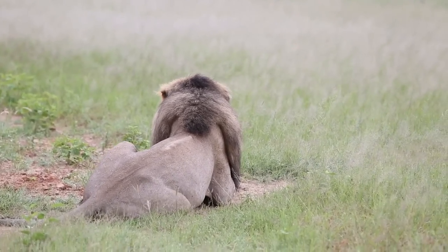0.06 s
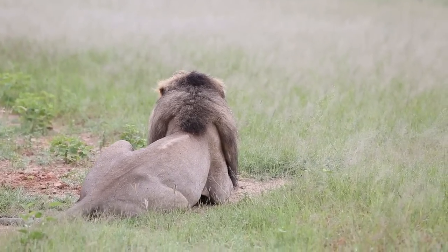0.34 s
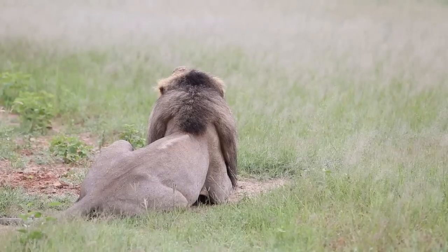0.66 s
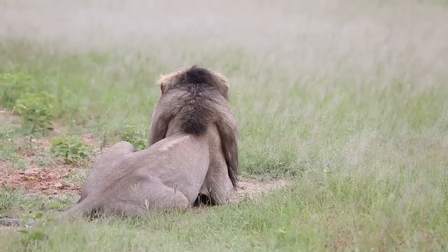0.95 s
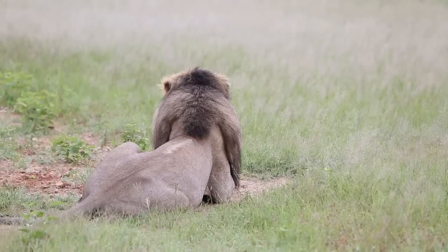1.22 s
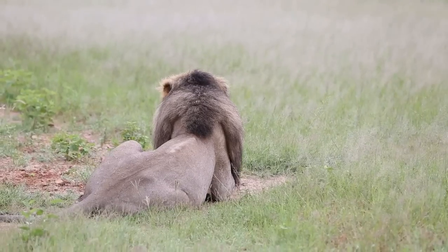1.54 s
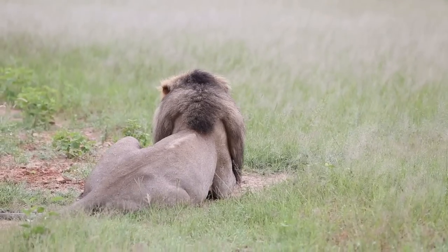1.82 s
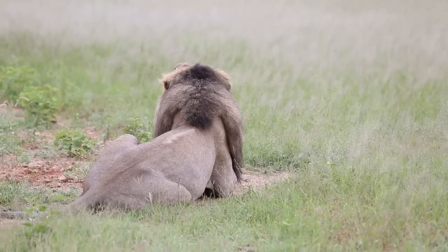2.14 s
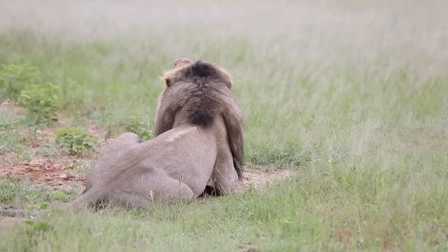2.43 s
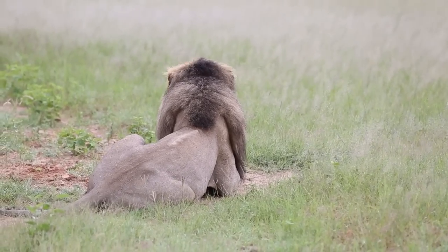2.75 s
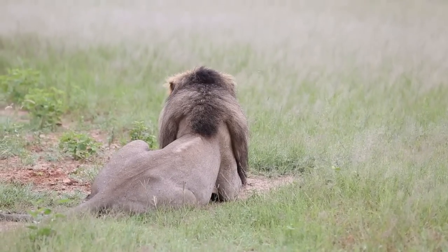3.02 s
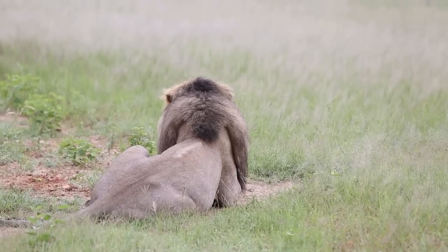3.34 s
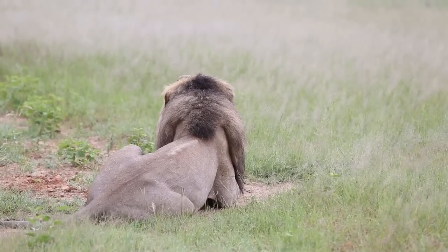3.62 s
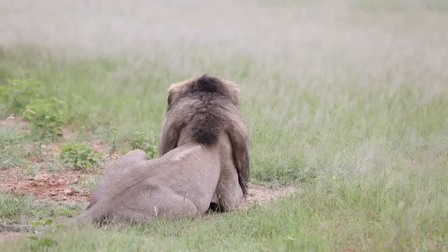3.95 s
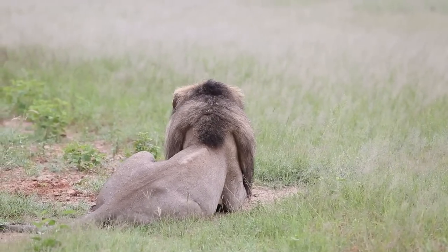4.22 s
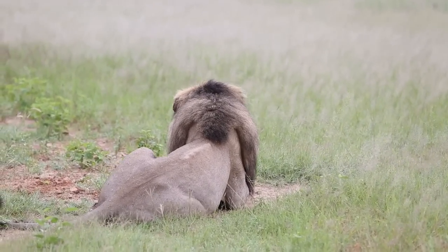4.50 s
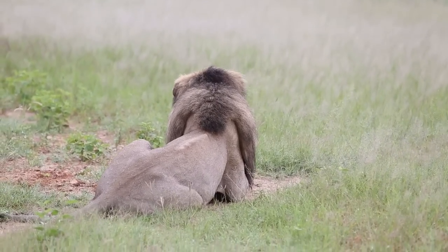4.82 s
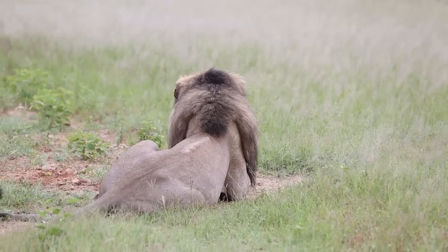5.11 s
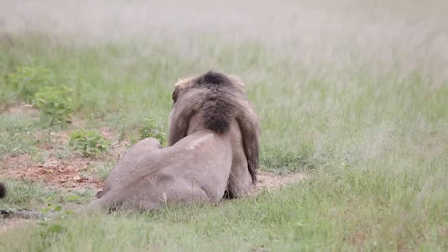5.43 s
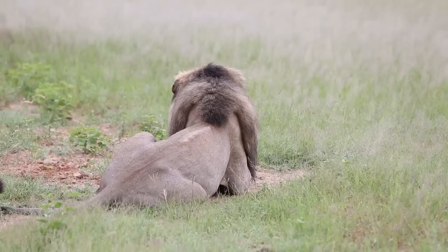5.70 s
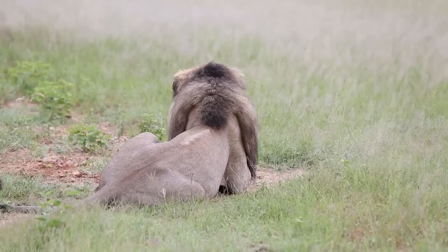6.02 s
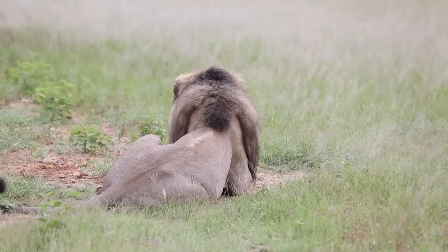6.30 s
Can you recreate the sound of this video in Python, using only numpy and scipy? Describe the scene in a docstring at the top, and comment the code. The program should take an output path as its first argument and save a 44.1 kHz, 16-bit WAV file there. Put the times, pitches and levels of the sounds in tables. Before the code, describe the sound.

In open grassland a lion moans twice, low and throaty, each call swelling and then falling away. A couple of soft body thuds and a quiet breath lead into three short, rough grunts at an even pace. The voice is loud and nearly dry at the microphone. Underneath, a light wind murmurs and hisses in the grass, and birds squawk faintly far off.

```python
"""In open grassland a lying lion gives two long moans and three shorter grunts.
The voice is a source and a filter: heavy vocal folds swing cleanly or break into a rasp,
and their closures excite the resonances of a long throat and a half-open mouth.
Between calls the lion draws air and shifts its weight with soft thuds.
Birds squawk and whistle far off, over the murmur, hiss and rumble of a light breeze."""
import sys
import numpy as np
from scipy import signal
from scipy.fft import rfft, irfft
from scipy.io import wavfile

SR = 44100
rng = np.random.default_rng(int(sys.argv[2]) if len(sys.argv) > 2 else 0)


def inscribe(sig):
    """Save sig as 16-bit PCM at rate SR to the path in sys.argv[1].

    A 1-D sig is mono; a 2-D sig holds one channel per row.
    Samples are clipped to [-1, 1] before scaling.
    """
    pcm = np.round(np.clip(np.atleast_2d(sig).T, -1, 1) * 32767)
    wavfile.write(sys.argv[1], SR, pcm.astype(np.int16))


N = 289296
TIME = np.arange(N) / SR
HELD_HZ = 134.4  # pitch at the end of a grunt's hold

# Gain laws of the voice's layers. Each gives: level in dB at full effort, dB per dB of effort,
# then dB added per unit of mouth opening (squared for the swing), of roughness and of throb depth.
SWING_GAIN = (-9.5, 1, -5.5, -2, -0.5)
THROAT_GAIN = (-27.5, 1.04, 0, 6.5, 5.5)
MOUTH_GAIN = (-37.5, 1, 15.5, 2.5, 0.5)
RASP_GAIN = (-59.5, 0.54, 10, 9.5, 0)
HISS_GAIN = (-62.5, 0.4, 4, 4.5, 2)
def lion():
    """Source and filter: the folds' swing is the fundamental; closures and air excite the tract."""
    (hz, effort_db, opening, rough, depth, cycles_per_throb), gate, spent = bout()

    def gain(law, openness=opening, full_effort_db=-10):
        full_db, slope, open_db, rough_db, throb_db = law
        driven_db = full_db + slope * (effort_db - full_effort_db)
        return undb(driven_db + open_db * openness + rough_db * rough + throb_db * depth)

    # slack, slow folds leak more air, and more escapes as a call runs out
    leak = undb(5.5 * np.log2(HELD_HZ / hz) + 4 * spent)
    hz = hz * (1 + (.009 + .07 * rough ** 2) * walk(45))  # pitch jitter
    cycles = np.cumsum(hz) / SR
    throb_phase = 2 * np.pi * np.cumsum(hz / cycles_per_throb) / SR
    swing = fold_swing(2 * np.pi * cycles, throb_phase, depth, rough)
    # even closures give clean overtones; ragged ones, each with a puff of air, give the rasp
    even = closures(cycles, scatter_db=1, slip_s=.00005)
    even = steady(even * (1 + .45 * depth * np.cos(throb_phase)), .06)
    puff = unit(np.exp(-(cycles % 1) / .3))
    ragged = steady(closures(cycles, scatter_db=6.5, slip_s=.0005) + puff * noise(), .013)
    voice = gain(SWING_GAIN, opening ** 2) * swing  # gives way when the mouth is wide open
    voice += gain(RASP_GAIN) * leak * rasp(even, ragged, puff, rough)
    voice += gain(HISS_GAIN) * leak * muzzle_hiss(puff)
    voice += gain(THROAT_GAIN) * throat(even, ragged, rough)
    voice += gain(MOUTH_GAIN) * mouth(even, ragged, rough, opening)
    return voice * gate


def fold_swing(phase, throb_phase, depth, rough):
    """Modulation: the throb adds a sideband on each side of the fundamental, the upper one stronger."""
    swing = np.sin(phase) * (1 + 3.38 * rough ** 2 * walk(51)) + .2 * np.sin(2 * phase)
    sidebands = .72 * np.sin(phase + throb_phase) + .45 * np.sin(phase - throb_phase)
    return steady(band(swing + depth * sidebands, 113.9, 281.4, order=5), .026)


def closures(cycles, scatter_db, slip_s):
    """Shimmer and jitter: one pulse a cycle, each with its own size and a little early or late."""
    crossings = np.flatnonzero(np.diff(np.floor(cycles)) > 0)
    chance = rng.standard_normal((len(crossings), 2))
    size = undb(scatter_db * chance[:, 0])
    on_time = np.interp(np.floor(cycles[crossings + 1]), cycles, np.arange(N))
    place = on_time + slip_s * SR * chance[:, 1]
    sample, part = np.clip(place.astype(int), 0, N - 2), place % 1
    return unit(np.bincount(sample, size * (1 - part), N) + np.bincount(sample + 1, size * part, N))


# Throat resonances. Each row: frequency in Hz, bandwidth in Hz, relative gain in dB.
THROAT_MODES = [(262, 38, -23), (314, 27, 26), (378, 9.4, 4), (448, 19, -0.5), (454, 140, -18.5)]
def throat(even, ragged, rough, flutter_db=3):
    """Resonance: the long throat rings at low formants, wavering in level."""
    source = np.sqrt(1 - rough ** 2) * even + 1.2 * rough * ragged
    formants = band(ring(source, THROAT_MODES), 287.8, 498, order=5)
    return steady(formants, .022) * undb(flutter_db * walk(20))


# Mouth resonances. Each row: frequency in Hz, bandwidth in Hz, relative gain in dB.
MOUTH_MODES = [(550, 27, -21.5), (700.3, 23.3, 5.5), (770, 53, -4), (865, 61, -1), (980, 46, 3),
               (1038.3, 67, 10), (1217, 35, 5.5), (1281, 40, 3.5), (1367, 68, -2)]
def mouth(even, ragged, rough, opening):
    """Formant filtering: an open jaw favours the upper resonances of the mouth."""
    # high overtones break up sooner than low ones
    hoarse = np.sqrt(1 - rough) * even + 1.8 * rough ** .75 * ragged
    jaw_db = -5 + 7 * opening
    formants = ring(hoarse, MOUTH_MODES[:4]) + undb(jaw_db) * ring(hoarse, MOUTH_MODES[4:])
    return steady(band(formants, 589, 1320, order=6), .16)


# High resonances of the voice. Each row: frequency in Hz, bandwidth in Hz, relative gain in dB.
RASP_MODES = [(1690, 94, 1), (1887, 150, -2), (2200, 190, -6), (2640, 200, -9), (2930, 96, -9.5),
              (3160, 110, -5)]
def rasp(even, ragged, puff, rough):
    """Aperiodic excitation: as roughness grows, ragged closures and breath drive the high formants."""
    breath = (1 + .35 * puff) * noise()
    source = (1 - rough) * even + 1.5 * rough * ragged + rough * breath
    return steady(band(ring(source, RASP_MODES), 1300, 3100, order=4), .45)


# Muzzle resonances. Each row: frequency in Hz, bandwidth in Hz, relative gain in dB.
MUZZLE_MODES = [(3940, 180, 8.5), (4360, 780, 1.5), (5260, 3800, -8), (6000, 1900, -9), (8300, 2000, -23.5)]
def muzzle_hiss(puff, flicker_db=2.3):
    """Turbulence: pulsing air excites muzzle resonances, each of which comes and goes by itself."""
    air = noise() * (1 + .5 * puff)
    hiss = sum(ring(air, [mode]) * undb(3 * walk(4)) for mode in MUZZLE_MODES)
    return unit(band(hiss, 3700, 11000, order=3)) * undb(flicker_db * walk(16))


# Fold vibration in the moans. Each row: time in seconds, pitch in Hz.
MOAN_PITCH = [(.08, 137.1), (.18, 190), (.3, 220), (.4, 234.2), (.52, 243.9), (.64, 220.5), (.735, 234),
              (.765, 174.5), (.9, 123.3), (.97, 140.9), (1.05, 101.7), (1.99, 120.7), (2.05, 158.2),
              (2.12, 185.1), (2.2, 192.1), (2.29, 193.5), (2.34, 176.6), (2.45, 176.8), (2.5, 155.3),
              (2.67, 113), (2.81, 100.2)]
# Effort and jaw, one list a moan. Each row: time in seconds, effort in dB, mouth opening from 0 to 1.
MOAN_EFFORT = [
    [(.025, -24.5, 0), (.1, -10, 0.05), (.21, -9, 0.2), (.27, -11.5, 0), (.35, -11, .25), (.42, -13, 0.36),
     (.48, -9.5, 0.34), (.62, -10, 0.28), (.68, -15.5, 0.69), (.75, -11.5, 0.95), (.78, -8.5, .15),
     (.84, -11.5, 0), (.92, -20.5, 0.27), (.98, -10.5, 0.24), (1.09, -49, 1)],
    [(1.94, -29.5, 0.12), (2.045, -7.5, 0.29), (2.2, -13.5, .62), (2.26, -12, 0.86), (2.39, -11.5, 0.83),
     (2.49, -11, 0.57), (2.54, -9, 0), (2.65, -17.5, 0.33), (2.74, -27, 0.34), (2.81, -48, 0.16)],
]
# The folds start ragged, clear and break again. Each row: time in seconds, roughness from 0 to 1.
MOAN_ROUGHNESS = [(.03, .6), (.19, .45), (.25, .16), (.42, .17), (.5, .25), (.63, .17), (.73, .65),
                  (.78, .12), (.84, .12), (.89, .7), (.97, .35), (2.04, .48), (2.15, .25), (2.35, .27),
                  (2.47, .48), (2.51, .1), (2.6, .12), (2.66, .55)]
# Throbs in the second moan. Each row: start in seconds, length in seconds, modulation depth,
# fold cycles per throb.
MOAN_THROBS = [(2.07, .26, 1.8, 5), (2.32, .18, 1, 3)]
def moans():
    """Subharmonic locking: the moans' controls glide, and a slower throb briefly locks to the folds."""
    depth, cycles_per_throb = np.zeros(N), np.ones(N)
    for start, length, peak_depth, count in MOAN_THROBS:
        depth = np.maximum(depth, peak_depth * np.abs(swell(start, length)) ** .5)
        cycles_per_throb[TIME > start] = count
    glides = curves(MOAN_PITCH) + curves(np.vstack(MOAN_EFFORT)) + curves(MOAN_ROUGHNESS)
    return np.array(glides + [depth, cycles_per_throb])


def grunt(start, rise_s, hold_s, fade_s, peak_db, peak_hz, peak_opening):
    """Period doubling follows the peak of a push whose controls rise, hold and slacken."""
    sag_s, slack_hz = .11, 98.7
    peak = start + rise_s
    slack = peak + hold_s
    stages = [start, peak, slack, slack + sag_s]
    hz = np.interp(TIME, stages, [.85 * peak_hz, peak_hz, HELD_HZ, slack_hz])
    rise_left = np.clip((peak - TIME) / rise_s, 0, 1)
    faded = np.clip((TIME - slack) / fade_s, 0, 1)
    effort_db = peak_db - 29 * (rise_left ** 2.15 + faded ** 1.54)
    opening = np.interp(TIME, stages, [0, peak_opening, .28, .39])
    # the folds are ragged at both ends and clearest late in the hold
    rough = np.interp(TIME, [start, peak, slack, slack + fade_s], [.55, .52, .27, .85])
    depth = 1.4 * np.exp(-((TIME - peak - .03) / .041) ** 2)
    cycles_per_throb = np.full(N, 2)
    return np.array([hz, effort_db, opening, rough, depth, cycles_per_throb])


# The grunts. Each row: start, rise, hold and fade in seconds, then at the peak the effort in dB,
# pitch in Hz and mouth opening from 0 to 1.
GRUNTS = [(3.488, 0.12, .15, .255, -10, 150.3, 0.46), (4.588, 0.11, .075, .245, -9.5, 136, 0.58),
          (5.6, .1, .075, 0.23, -10.5, 126.8, 0.21)]
def bout():
    """Phonation in five breaths: the controls, a gate open in each call, and its progress (0 to 1)."""
    controls = moans()
    spans = [(moan[0][0], moan[-1][0]) for moan in MOAN_EFFORT]
    for start, rise_s, hold_s, fade_s, *at_peak in GRUNTS:
        mid_pause = (spans[-1][1] + start) / 2
        controls = np.where(TIME > mid_pause, grunt(start, rise_s, hold_s, fade_s, *at_peak), controls)
        spans.append((start, start + rise_s + hold_s + fade_s))
    spent = np.interp(TIME, np.ravel(spans), [0, 1] * len(spans))
    return controls, sounding(spans, fade_s=.017), spent


# The folds catch and slap shut. Each row: time in seconds, peak level in dB.
FOLD_CATCHES = [(.116, -17.5), (.192, -19), (2.044, -13), (2.645, -21), (3.562, -24), (3.609, -15),
                (4.683, -16), (4.707, -14), (5.674, -23)]
def catches():
    """Impulse response: a single hard closure makes the mouth crack."""
    slaps = np.zeros(N)
    for start, db in FOLD_CATCHES:
        slaps[int(start * SR)] += undb(db)
    crack = band(ring(signal.unit_impulse(SR // 10), MOUTH_MODES), 600, 1400, order=5)
    return signal.fftconvolve(slaps, crack / np.abs(crack).max())[:N]


# Hollow vowels as the calls die. Each row: start in seconds, peak level of the lower tone in dB.
THROAT_RELEASES = [(0.864, -24), (0.979, -23), (2.628, -16.5), (2.709, -29), (3.868, -21.5), (4.846, -22.5),
                   (5.84, -16.5), (5.965, -29.5)]
def releases(length_s=.0579, from_hz=268, to_hz=321):
    """Formant glide: as the throat relaxes, its lowest resonance and a weak, breathy upper one rise."""
    out = np.zeros(N)
    for start, db in THROAT_RELEASES:
        out += glide(start, length_s, from_hz, to_hz, db, waver=.0414)
        out += glide(start, length_s, 2.5 * from_hz, 2.8 * to_hz, db - 16, waver=.1)
    return out


# Breaths drawn before a call. Each row: start and length in seconds, chest and muzzle levels in dB.
INHALATIONS = [(1.646, 0.28, -35.5, -53.5), (3.173, 0.24, -56, -61), (3.382, 0.073, -40, -55)]
def inhalations():
    """Turbulent inflow: air flutters low in the chest and rushes through the muzzle's resonances."""
    chest_spectrum = [(25, -13), (70, .5), (140, 7), (300, -3), (500, -10.5), (1000, -59)]
    chest = steady(colour(noise(), chest_spectrum), .45)
    rush = ring(noise(), [(825, 96, 31), (1250, 230, 27.5), (1900, 500, -8)])
    muzzle = unit(band(rush, 500, 2100)) * undb(2 * walk(30))
    out = np.zeros(N)
    for start, length, chest_db, muzzle_db in INHALATIONS:
        gate = sounding([(start, start + length)], fade_s=.01)
        out += (undb(chest_db) * chest + undb(muzzle_db) * muzzle) * gate
    return out


# The lion shifts its weight. Each row: centre in seconds, envelope peak in dB, frequency in Hz.
BODY_THUDS = [(3.102, -18, 123), (3.122, -28, 70), (3.306, -25.5, 114)]
def thuds():
    """Pressure transients: each soft thud is about one cycle of a low tone."""
    return sum(undb(db) * np.exp(-((TIME - at) * hz / .3) ** 2) * np.sin(2 * np.pi * hz * (TIME - at))
               for at, db, hz in BODY_THUDS)


# Distant squawks. Each row: start in seconds, then the third harmonic's peak level in dB
# and centre frequency in Hz.
BIRD_SQUAWKS = [(1.557, -55, 2020), (2.915, -57.5, 1865), (3.226, -59, 2200), (4.19, -47, 1806),
                (4.567, -43.5, 1878), (6.11, -42.5, 1876), (6.228, -48.5, 1765)]
# A falling whistle: start and length in seconds, first and last frequency in Hz.
BIRD_WHISTLE = (1.815, .145, 6500, 1950)
def birds(squawk_s=.07):
    """Frequency modulation: harsh squawks on harmonics three to five, a whistle and a short close pip."""
    out = np.zeros(N)
    for start, db, third_hz in BIRD_SQUAWKS:
        for harmonic, tilt_db in ((3, 0), (4, -1), (5, -6)):
            hz = third_hz * harmonic / 3
            out += glide(start, squawk_s, .96 * hz, 1.04 * hz, db + tilt_db, waver=.05)
    whistle = glide(*BIRD_WHISTLE, db=-53, waver=.047)
    pip = glide(start_s=.003, length_s=.028, from_hz=1080, to_hz=960, db=-20, waver=.06)
    return out + whistle + pip


def scatter(x, wet_db, t60_s):
    """Scattering: the ground and far bushes return a faint, dull tail that decays exponentially."""
    tail = band(noise(), 150, 1200) * undb(-60 * TIME / t60_s) * np.clip(TIME / .011, 0, 1)
    return undb(wet_db) * signal.fftconvolve(x, tail / np.sqrt(np.sum(tail ** 2)))[:N]


# Spectrum of the air over the field. Each row: frequency in Hz, relative spectral density in dB.
AIR_SPECTRUM = [(12, -48), (20, -23.5), (74, -35.5), (137, 4.5), (175, -8.5), (238, -13), (289, -10.5),
                (342, -10), (382, -16.5), (478, -15), (597, -18.5), (1340, -25.5), (1820, -31),
                (2270, -31.5), (15500, -44.5)]
# Background levels: the low rumble wanders, and the hiss dips after loud calls and recovers.
# Each row: time in seconds, rumble level in dB, treble gain in dB.
BACKGROUND_LEVELS = [(.08, -48, 7.5), (.3, -54, -4.5), (.9, -54, -6), (1.35, -61, -1.5), (1.65, -60.5, 4.5),
                     (2.3, -59.5, 2), (2.65, -54.5, -8.5), (3.3, -48.5, 3.5), (3.85, -55, -1.5),
                     (4.2, -56, 4), (5.9, -55.5, 2), (6.55, -63, 2.5)]
def background():
    """Broadband flow noise: a distant murmur of wind, hiss in the grass and a wandering low rumble."""
    rumble_db, treble_db = curves(BACKGROUND_LEVELS)
    air = undb(-44.5) * colour(noise(), AIR_SPECTRUM)
    low = signal.sosfiltfilt(signal.butter(2, 1500, fs=SR, output="sos"), air)
    rumble = unit(band(noise(), 26, 89)) * undb(rumble_db + 2.5 * walk(4.9))
    murmur = low * undb(-2.5 + .33 * treble_db + 1.8 * walk(4.9))
    hiss = (air - low) * undb(treble_db)
    return murmur + hiss + rumble


def undb(db):
    """Decibels to amplitude ratio."""
    return 10 ** (np.asarray(db) / 20)


def unit(x):
    """Normalisation to rms 1."""
    return x / np.sqrt(np.mean(x ** 2))


def steady(x, span_s):
    """Gain control: hold the short-term rms at 1."""
    window = np.hanning(int(span_s * SR))
    return x / np.sqrt(signal.fftconvolve(x ** 2, window, "same") / window.sum() + 1e-9)


def curves(table):
    """Linear interpolation of a table's columns in time."""
    times, *columns = np.transpose(table)
    return [np.interp(TIME, times, column) for column in columns]


def sounding(spans, fade_s):
    """Gating: 1 within each (start, end) span, fading to 0 outside."""
    return sum(np.clip(np.minimum(TIME - start, end - TIME) / fade_s + .5, 0, 1) for start, end in spans)


def swell(start_s, length_s):
    """A half-sine envelope."""
    return np.sin(np.pi * np.clip((TIME - start_s) / length_s, 0, 1))


def glide(start_s, length_s, from_hz, to_hz, db, waver):
    """An exponential sweep: one note with a slightly unsteady pitch."""
    hz = from_hz * (to_hz / from_hz) ** np.clip((TIME - start_s) / length_s, 0, 1)
    phase = 2 * np.pi * np.cumsum(hz * (1 + waver * walk(200))) / SR
    return undb(db) * swell(start_s, length_s) * np.sin(phase)


def noise():
    """White noise."""
    return rng.standard_normal(N)


def walk(rate_hz):
    """Random fluctuation: low-passed noise of rms 1."""
    return unit(signal.sosfilt(signal.butter(2, rate_hz, fs=SR, output="sos"), noise()))


def band(x, lo_hz, hi_hz, order=2):
    """Band-pass filtering."""
    return signal.sosfilt(signal.butter(order, [lo_hz, hi_hz], "band", fs=SR, output="sos"), x)


def colour(x, points):
    """Spectral shaping by (Hz, dB) points, scaled to rms 1."""
    hz, db = np.transpose(points)
    bin_hz = np.maximum(np.fft.rfftfreq(N, 1 / SR), 1)
    return unit(irfft(rfft(x) * undb(np.interp(np.log(bin_hz), np.log(hz), db)), N))


def ring(x, modes):
    """Parallel resonators, each given as (Hz, bandwidth in Hz, dB)."""
    return sum(undb(db) * signal.lfilter(*signal.iirpeak(hz, hz / width, fs=SR), x)
               for hz, width, db in modes)


def scene():
    """Superposition: the calls, their tail, breaths, thuds and background add in one channel."""
    calls = lion() + catches() + releases() + birds()
    tail = scatter(calls, wet_db=-25, t60_s=.55)
    return (calls + tail + inhalations() + thuds() + background())[None]


def record(dry, top_hz=15550):
    """Band limiting: a steep low-pass filter cuts the highest treble."""
    return signal.sosfilt(signal.ellip(12, .2, 80, top_hz, fs=SR, output="sos"), dry)


dry = scene()
out = record(dry)
inscribe(out)
```